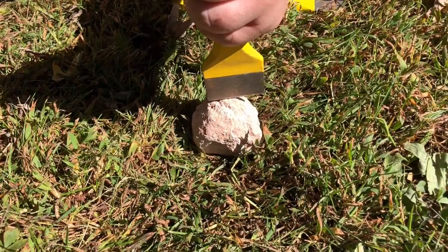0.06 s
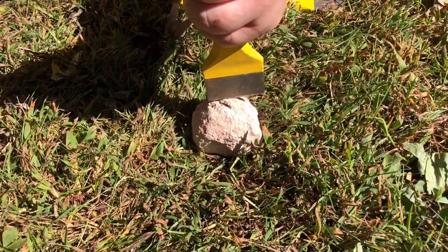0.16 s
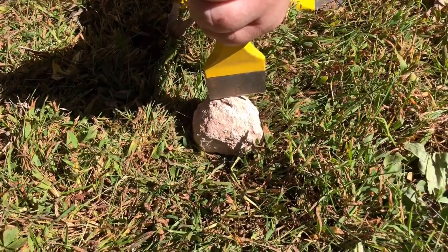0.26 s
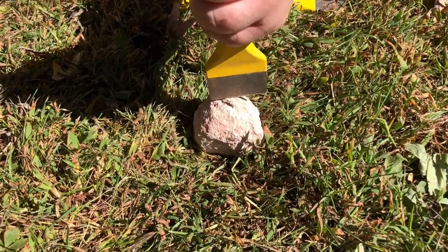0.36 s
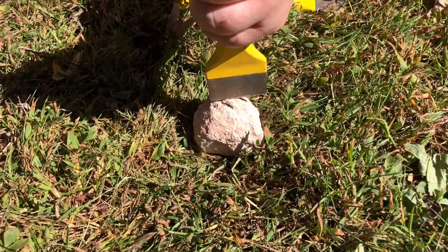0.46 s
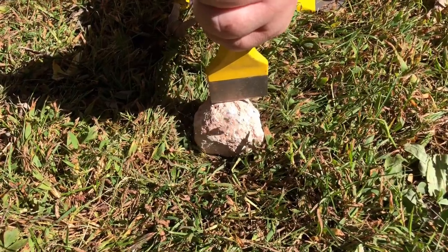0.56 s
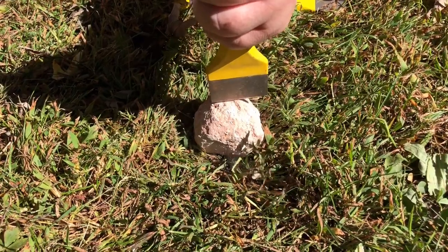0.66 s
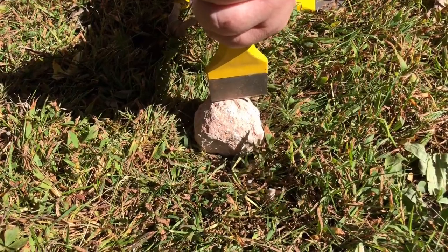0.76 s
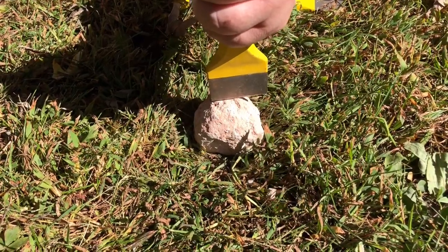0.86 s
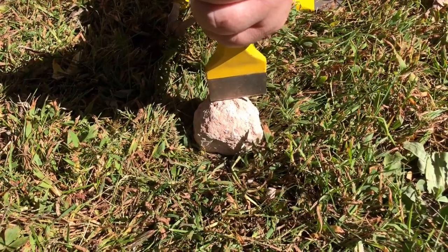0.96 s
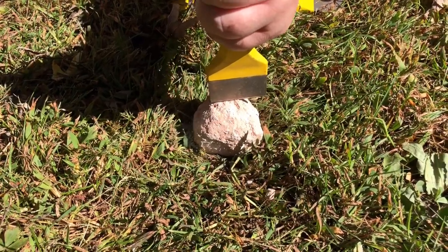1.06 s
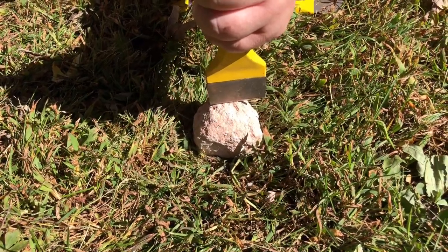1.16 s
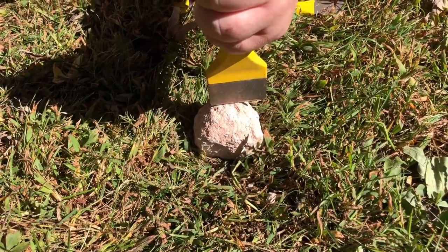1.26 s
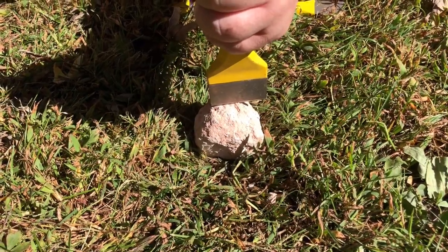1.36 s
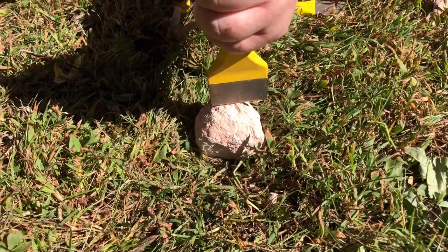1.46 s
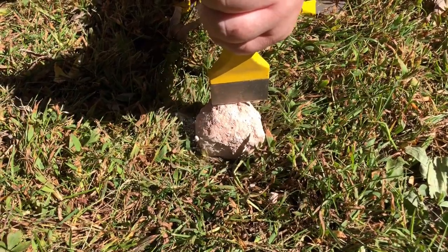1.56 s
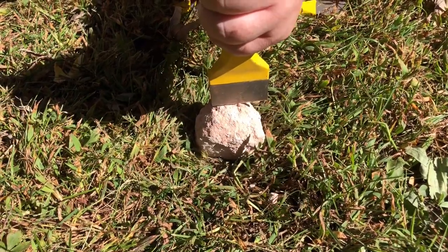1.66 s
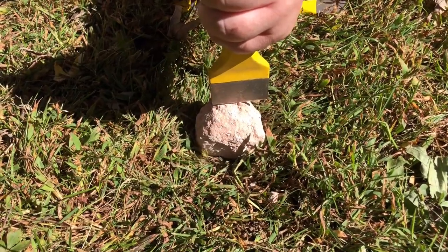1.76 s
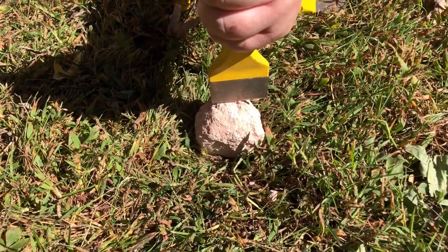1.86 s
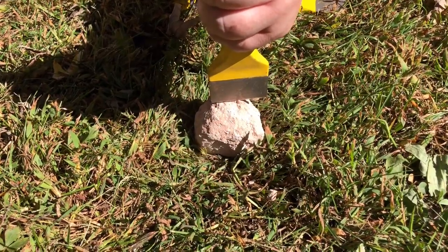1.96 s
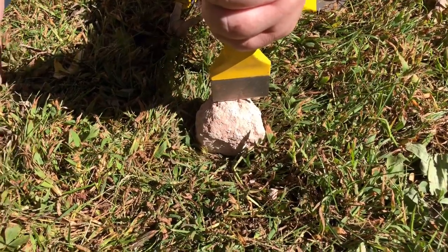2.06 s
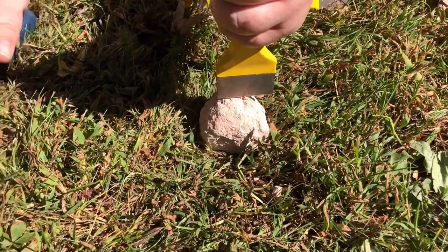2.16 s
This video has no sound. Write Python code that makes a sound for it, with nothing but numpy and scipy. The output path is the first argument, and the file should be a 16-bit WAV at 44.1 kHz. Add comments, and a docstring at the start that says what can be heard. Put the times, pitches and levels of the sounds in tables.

```python
"""Outdoors, far traffic rumbles and insects hiss: shaped noise whose bands waver, with a faint far hum.
A mallet taps a steel chisel held on a stone lying in grass: four blows close to the microphone.
Each cracks and chatters twice (damped modes), leaves the blade ringing, thumps late through the soil,
hums in the hollow stone and returns from a wall and yard (knocks and fading noise).
Grit and stalks tick; at the end a hand brushes the grass (shaped noise) and a faint steady chirp enters."""
import sys
import numpy as np
from scipy import signal
from scipy.fft import rfft, irfft
from scipy.io import wavfile

SR = 44100
rng = np.random.default_rng(int(sys.argv[2]) if len(sys.argv) > 2 else 0)


def log_audio(samples):
    """Write samples as a 16-bit WAV file to the path given in sys.argv[1]."""
    # one column per channel
    frames = np.atleast_2d(samples).T
    # limit to full scale, then quantise
    limited = np.clip(frames, -1, 1)
    pcm = np.round(limited * 32767).astype(np.int16)
    wavfile.write(sys.argv[1], SR, pcm)


N = 97020

# mallet blows: start_s, force_db, crack_hz, tilt_db_per_octave, rebound_1_db, rebound_2_db (both re force),
# blade_db (re 1), upper_blade_db (re blade_db), thump_db, hollow_db (re 1), ping_hz, ping_db, wall_db (re 1)
BLOWS = [(.2058, -2, 5050, -0.36, -3.5, -23, -13, -23, -17, -39.5, 1157, -50, -46),
         (0.6763, -2.5, 5220, -0.3, -1.5, -17, -8, -32, -20, -32, 4440, -25.5, -51.5),
         (1.1422, -4, 4700, -1.2, -4.5, -23, -22.5, -6, -19.5, -33.5, 4550, -9, -54.5),
         (1.6222, -3.5, 4340, -1.3, -2.5, -20, -21.5, -23, -17, -34.5, 4540, -17, -47.5)]
(BLOW_S, FORCE_DB, CRACK_HZ, TILT_DB_PER_OCTAVE, REBOUND_1_DB, REBOUND_2_DB, BLADE_DB,
 UPPER_BLADE_DB, THUMP_DB, HOLLOW_DB, PING_HZ, PING_DB, WALL_DB) = np.transpose(BLOWS)


def amp(db):
    """dB to gain."""
    return 10 ** (np.asarray(db) / 20)


def rms_one(x):
    """Scale to rms 1."""
    return x / np.sqrt(np.mean(x ** 2) + 1e-20)


def in_time(rows):
    """Table columns as curves over the samples; the first column is the time in s."""
    s, *columns = np.transpose(rows)
    t = np.arange(N) / SR
    return [np.interp(t, s, column) for column in columns]


def coloured(points):
    """Noise of rms 1 with a spectrum drawn through (Hz, dB) points on a log frequency axis."""
    hz, db = np.transpose(points)
    grid_hz = np.maximum(np.fft.rfftfreq(N, 1 / SR), 1)
    gain = amp(np.interp(np.log(grid_hz), np.log(hz), db, left=-60))
    return rms_one(irfft(rfft(rng.standard_normal(N)) * gain, N))


def band(x, low_hz, high_hz, order=2):
    """Butterworth band-pass."""
    return signal.sosfilt(signal.butter(order, [low_hz, high_hz], "band", fs=SR, output="sos"), x)


def smooth(x, time_s):
    """One-pole lag with unit gain at rest."""
    r = np.exp(-1 / (time_s * SR))
    return signal.lfilter([1 - r], [1, -r], x)


def drift(rate_hz):
    """Slow random curve of rms 1: noise through two equal poles, after 1 s of settling."""
    r = np.exp(-2 * np.pi * rate_hz / SR)
    return rms_one(signal.lfilter([1], [1, -2 * r, r * r], rng.standard_normal(N + SR))[SR:])


def ring(x, hz, t60_s):
    """Two-pole resonator: a unit click starts a decaying sine of height 1."""
    r = amp(-60 / (t60_s * SR))
    w = 2 * np.pi * hz / SR
    return signal.lfilter([0, np.sin(w)], [1, -2 * r * np.cos(w), r * r], x + 1e-18)


def noise_ring(hz, t60_s):
    """Narrow noise of rms 1: a resonator driven by white noise."""
    return rms_one(ring(rng.standard_normal(N), hz, t60_s))


def clicks(s, db):
    """One-sample clicks at the given times and levels."""
    out = np.zeros(N)
    np.add.at(out, (np.ravel(s) * SR).astype(int), amp(np.ravel(db)))
    return out


def fade(x, t60_s):
    """Each click becomes an exponential envelope."""
    return signal.lfilter([1], [1, -amp(-60 / (t60_s * SR))], x + 1e-18)


def outdoors():
    """Rumble, air and insects as shaped noise, each band wavering a little; a faint far hum."""
    # rumble and air spectrum: pitch_hz, density_db
    air_colour = [(15, -66), (25, -35), (48, -6.5), (75, -0.5), (115, 0.5), (239, -11), (352, -14.5),
                  (442, -19), (542, -20.5), (763, -24), (817, -20), (1180, -21), (1320, -22.5), (1550, -20),
                  (1690, -22), (3590, -26.5), (5800, -23.5), (7540, -68.5), (12800, -120)]
    # band levels in time: start_s, level_db, middle_db, insect_db (the last two over the mean level)
    air_level = [(0.0, -45, -1.3, 1), (0.32, -45.5, 0.8, 3.7), (0.48, -45.5, -1.1, 1.4),
                 (0.97, -48, -2.3, 0.2), (1.45, -49.5, -6.5, -4.3), (1.63, -49.5, -2.3, 1.5),
                 (2.2, -49, -7.1, -5.8)]
    # insect spectrum: pitch_hz, density_db
    insect_colour = [(3240, -48), (5500, -10.5), (5610, -16), (5810, -7), (6650, -5.5), (7460, -9.5),
                     (8040, -12.5), (9000, -25.5), (11700, -70), (19800, -120)]
    # thin air above the insects: pitch_hz, density_db
    top_colour = [(5180, -27.5), (8800, -8.5), (10300, -9.5), (13400, -9.5), (16000, -15)]
    insects_db, top_air_db = -10, -72.5   # insects over the mean level
    hum_hz, hum_t60_s, hum_db = 1316, 3.0 / 12, -70

    level_db, middle_db, insect_db = in_time(air_level)
    air = coloured(air_colour)
    below_500, below_5500 = (signal.sosfiltfilt(signal.butter(4, hz, fs=SR, output="sos"), air)
                             for hz in (500, 5500))
    rumble = below_500 * amp(level_db + 1.5 * drift(16))
    middle = (below_5500 - below_500) * amp(middle_db + 0.83 * drift(5))
    insects = coloured(insect_colour) * amp(insects_db + insect_db + 0.26 * drift(12))
    hum = noise_ring(hum_hz, hum_t60_s) * amp(hum_db + 5.3 * drift(6))
    top_air = amp(top_air_db) * coloured(top_colour)
    return rumble + amp(level_db.mean()) * (middle + insects) + hum + top_air


def grass():
    """Ticks are short rings, brushed stalks are shaped noise, the faint chirp is a steady sine."""
    # grit and stalks: start_s, level_db, pitch_hz
    ticks = [(.801, -38, 14000), (.9795, -32, 3150), (.9796, -39, 5470), (.9797, -37, 10700),
             (0.9817, -31, 13800), (2.007, -46, 13720), (2.152, -29, 6200)]
    # hand in the grass: start_s, level_db (before brush_gain_db)
    brush_level = [(2.06, -84), (2.078, -75), (2.106, -51.5), (2.15, -43.5), (2.17, -50), (2.2, -50)]
    # brush spectrum: pitch_hz, density_db
    brush_colour = [(290, -5), (500, -7.5), (1910, -6.5), (2210, -11), (2640, -7), (8340, -6), (15200, 0),
                    (16300, -4)]
    tick_cycles, brush_gain_db = 14, 2.5   # cycles per 60 dB of decay
    chirp_s, chirp_hz, chirp_db, chirp_rise_s = 2.175, 3760, -53.5, 0.0074

    t = np.arange(N) / SR
    ticking = sum(ring(clicks(s, db), hz, tick_cycles / hz) for s, db, hz in ticks)
    brush_db, = in_time(brush_level)
    brush_gain = (t > brush_level[0][0]) * amp(brush_db + brush_gain_db + 1.2 * drift(156))
    brushing = brush_gain * coloured(brush_colour)
    chirp_gain = amp(chirp_db) * np.clip((t - chirp_s) / chirp_rise_s, 0, 1)
    return ticking + brushing + chirp_gain * np.sin(2 * np.pi * chirp_hz * t)


def echoes():
    """Fading noise for near scatter, wall slap and yard wash; rings for wall knocks and what lingers."""
    # echo spectrum: pitch_hz, density_db
    echo_colour = [(350, -69), (600, -46), (1070, -1), (1160, -5), (1680, -4), (1830, -13), (2310, 1.5),
                   (4280, -2.5), (5330, -29), (7940, -47), (11800, -11.5), (13000, -21), (16000, -27)]
    # resonances in the echo: pitch_hz, nominal_width_hz, level_db (before -13 dB)
    echo_rings = [(1910, 57, 5.5), (2980, 41, 9), (5410, 780, 18.5), (10050, 250, 0)]
    # rings that linger in the wash: pitch_hz, nominal_width_hz, level_db, t60_s
    yard_rings = [(5410, 158, -49, 0.74), (2947, 73, -59.5, 1.2), (12800, 120, -58.5, .4)]
    # wall knock modes: pitch_hz, level_db (over wall_db), t60_s
    wall_knocks = [(1810, 8, 0.042), (5280, 17, 0.031), (5700, 11, .02), (3760, 2, 0.0178),
                   (10600, 3.5, .03)]
    # three facets of the wall: lag_s
    knock_lag_s = [.044, .0475, .052]
    # three facets of the wall: level_db
    knock_db = [-10.5, 1, -14.5]
    wall_s, wall_rise_s, wall_t60_s = .042, .004, .08
    yard_s, yard_db, yard_t60_s = 0.036, -41.5, 0.29
    near_db, near_t60_s = -39, .1
    same = 0 * BLOW_S   # equal level for all blows

    noise = coloured(echo_colour)
    for hz, width_hz, db in echo_rings:
        noise = noise + amp(db - 13) * noise_ring(hz, 3.1 / width_hz)
    slap = fade(clicks(BLOW_S + wall_s, WALL_DB), wall_t60_s)
    wash = fade(clicks(BLOW_S + yard_s, yard_db + same), yard_t60_s)
    near = fade(clicks(BLOW_S, near_db + same), near_t60_s)
    envelope = smooth(slap + wash + near, wall_rise_s)
    out = rms_one(noise) * envelope * amp(2 * drift(120))

    for hz, width_hz, db, t60_s in yard_rings:
        out += noise_ring(hz, 1.6 / width_hz) * fade(clicks(BLOW_S + wall_s, db + same), t60_s)
    for hz, db, t60_s in wall_knocks:
        scatter_s = 0.0033 * rng.random((len(BLOW_S), 3))
        hits = clicks(BLOW_S[:, None] + knock_lag_s + scatter_s, WALL_DB[:, None] + db + knock_db)
        out += band(ring(hits, hz, t60_s), 0.81 * hz, 1.3 * hz)
    return out


def soil():
    """A low resonance arrives late through the ground; the cavity of the stone hums, wavering."""
    # cavity of the stone: pitch_hz, level_db (over hollow_db), t60_s
    hollow_modes = [(448, 4.3, 0.13), (382, -2, 0.12)]
    lag_s, thump_hz, thump_t60_s = 0.0151, 89.5, 0.1

    thump = ring(clicks(BLOW_S + lag_s, THUMP_DB), thump_hz, thump_t60_s)
    hum = sum(ring(clicks(BLOW_S + 0.00281, HOLLOW_DB + db), hz, t60_s) for hz, db, t60_s in hollow_modes)
    return band(thump, 44, 353) + band(hum, 170, 470) * amp(2.5 * drift(30))


def blade():
    """Free modes of the steel sing on after each blow, wavering in the hand."""
    # free ring of the blade: pitch_hz, level_db (over blade_db), t60_s
    blade_modes = [(12680, 0, .095), (12640, -15, .08), (12830, -22, .14), (13070, -22, .05),
                   (10230, -22, .04), (9150, -36, .1)]
    # upper ring: pitch_hz, level_db (over blade_db + upper_blade_db), t60_s
    upper_modes = [(14570, 0, .11), (14660, -6, .09), (14040, -15, .06)]

    out = np.zeros(N)
    for modes, more_db in [(blade_modes, 0), (upper_modes, UPPER_BLADE_DB)]:
        for hz, db, t60_s in modes:
            scatter_db = rng.normal(0, 1.3, len(BLOW_S))
            out += ring(clicks(BLOW_S, BLADE_DB + more_db + db + scatter_db), hz, t60_s)
    return band(out, 8000, 17000) * amp(2.5 * drift(60))


def crack():
    """Blow and two rebounds excite a short burst, hand-damped modes, one longer ping and a spit of grit."""
    # stone and chisel, damped by the hand: pitch_hz, level_db (over force, before tilt), t60_s
    body_modes = [(867, -10, 0.01226), (1103.4, -11, 0.013), (1263, -23, 0.054), (1727, -9.5, 0.01),
                  (2140, -4, 0.0051), (2593, -7, 0.011), (3174, -11.5, 0.026), (3940, 0, 0.0061),
                  (5416, 3.5, .011), (6262, -0.5, 0.0076), (7376, -4.5, 0.011), (7040, -15, 0.027),
                  (10230, -9.5, 0.01), (12600, -16, 0.016), (13720, -18.5, .016), (14600, -27, 0.011)]
    # two rebounds: lag_s
    rebound_s = [.0039, .0068]
    contact_s, scatter_db = 0.00083, 1
    crack_t60_s, ping_t60_s = .0045, .028   # crack: each of two resonators in series
    grit_db, grit_t60_s = -14, 0.01354

    hit_s = BLOW_S[:, None] + [0, *rebound_s]
    hit_db = FORCE_DB[:, None] + np.transpose([0 * BLOW_S, REBOUND_1_DB, REBOUND_2_DB])
    out = np.zeros(N)
    for k, hz in enumerate(CRACK_HZ):
        burst = ring(clicks(hit_s[k], hit_db[k] - 18), hz, crack_t60_s)
        out += ring(burst, hz, crack_t60_s)
        out += ring(clicks(hit_s[k, 1], PING_DB[k]), PING_HZ[k], ping_t60_s)   # at the first rebound
    for j, (hz, db, t60_s) in enumerate(body_modes):
        tilt_db = TILT_DB_PER_OCTAVE[:, None] * np.log2(hz / 3000)
        level_db = hit_db + db + tilt_db + scatter_db * rng.standard_normal(hit_s.shape)
        lag_s = contact_s * rng.random(hit_s.shape)
        out += (-1) ** j * ring(clicks(hit_s + lag_s, level_db), hz, t60_s)   # alternate polarity
    grit = band(rng.standard_normal(N), 1220, 11000)
    out += amp(grit_db) * fade(clicks(hit_s, hit_db), grit_t60_s) * grit
    return band(out, 710, 15000, order=4)


def scene():
    """Everything at one microphone."""
    return (outdoors() + grass() + echoes() + soil() + blade() + crack())[None]


def record(dry):
    """Gain control ducks just after each blow, tanh rounds the peaks, an elliptic filter cuts the top."""
    limit_db, squeeze, lag_s, release_db_per_s = -12, .6, .004, 1300
    ceiling, cutoff_hz = 1.15, 15900

    over_db = np.maximum(20 * np.log10(np.abs(dry) + 1e-9) - limit_db, 0)
    # peak hold that falls at the release rate
    ramp_db = release_db_per_s * np.arange(N) / SR
    held_db = np.maximum.accumulate(over_db + ramp_db, axis=1) - ramp_db
    ducked = dry * amp(-squeeze * smooth(held_db, lag_s))
    rounded = ceiling * np.tanh(ducked / ceiling)
    return signal.sosfilt(signal.ellip(14, .5, 85, cutoff_hz, fs=SR, output="sos"), rounded)


dry = scene()
out = record(dry)
log_audio(out)
```